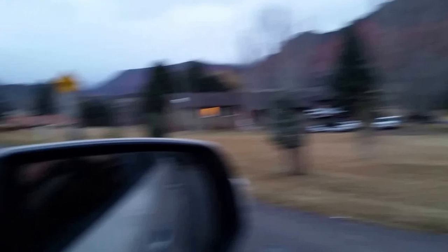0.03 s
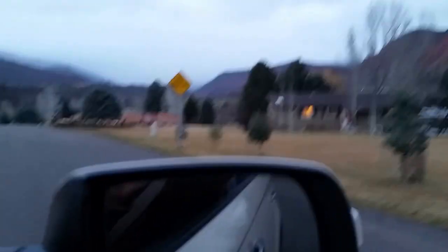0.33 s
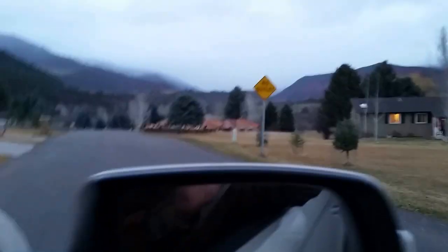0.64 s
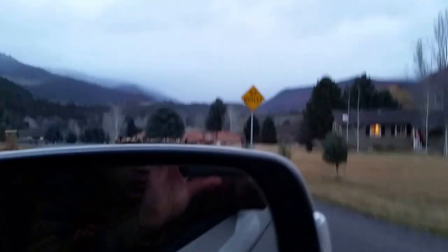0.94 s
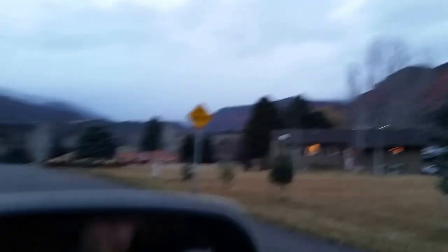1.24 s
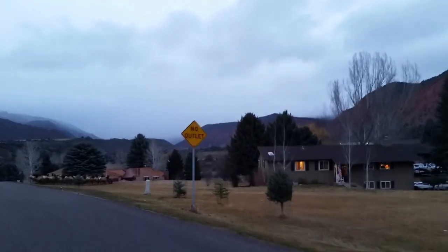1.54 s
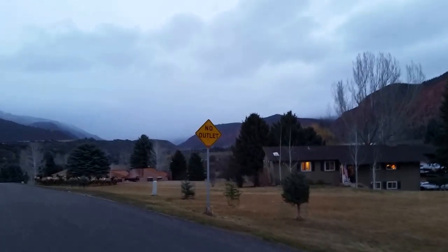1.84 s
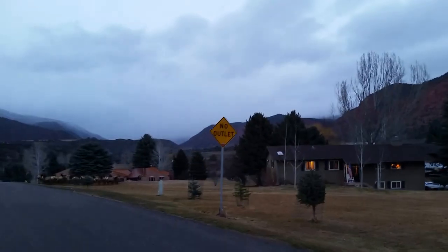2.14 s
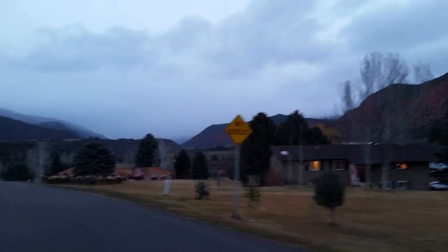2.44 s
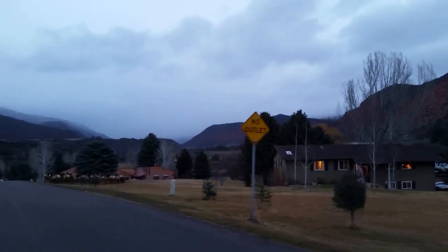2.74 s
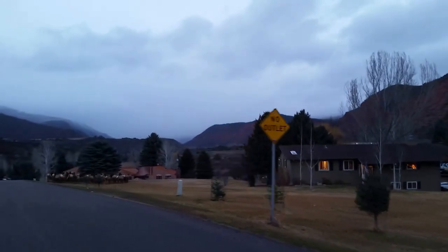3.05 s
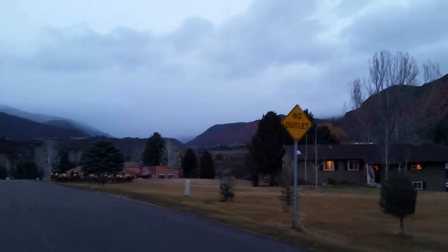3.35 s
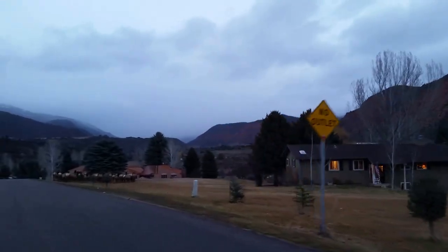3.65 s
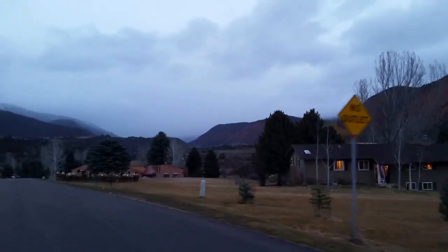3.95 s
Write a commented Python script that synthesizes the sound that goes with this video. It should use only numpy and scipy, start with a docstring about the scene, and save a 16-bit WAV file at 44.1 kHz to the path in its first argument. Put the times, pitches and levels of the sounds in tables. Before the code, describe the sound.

Low, rumbling wind starts after a near-silent moment and keeps hitting the microphone in uneven thumps and rasping flutters, shifting between left and right. It is held at a moving car's window, with faint tyre hiss and a small tick.

```python
"""Wind buffets a microphone held at the window of a car rolling along a quiet road.
Its two openings (ports), left and right, each get their own low rumble and sputtering flutter.
Single swirls of air (eddies) thump them and, when sharp, tear into a rasp. All this wind is built
from tiny kicks of air pressure. Under it lie faint tyre and air hiss, one sharp tick, a few tiny
ones and a brief brush on the housing."""
import sys
import numpy as np
from scipy import signal
from scipy.fft import rfft, irfft
from scipy.io import wavfile
from scipy.ndimage import uniform_filter1d, minimum_filter1d

SR = 44100
rng = np.random.default_rng(int(sys.argv[2]) if len(sys.argv) > 2 else 0)


def store_pcm(level_fs):
    """Save levels as 16-bit WAV."""
    pcm = np.round(np.clip(level_fs, -1, 1) * 32767).astype(np.int16)
    wavfile.write(sys.argv[1], SR, np.atleast_2d(pcm).T)


N = 176400  # 4 seconds
T = np.arange(N) / SR
HZ = np.fft.rfftfreq(N, 1 / SR)

# How the two hisses rise and fall. Each row: time in seconds, level in dB. Table levels are relative.
ROAD_LEVEL = [(0, -116), (.37, -101), (.48, -73), (.67, -64.5), (.8, -68.5), (1.28, -76.5), (1.45, -72.5),
              (2.08, -78.5), (2.3, -75), (2.58, -68.5), (3.45, -65), (4, -65.5)]
AIR_LEVEL = [(0, -118), (.37, -95), (.49, -70), (.66, -54.5), (.78, -57.5), (.9, -63), (1.08, -79.5),
             (1.64, -80.5), (1.76, -71.5), (2.08, -84), (2.55, -69), (2.98, -70.5), (3.72, -66), (4, -72.5)]
# Ticks on the housing. Each row: start in seconds, left level in dB, right level in dB,
# strength of the snap against the knock in dB.
TICKS = [(.389, -72, -53, 2.5), (.449, -72, -54.5, 1.5), (.828, -31, -26.5, 10), (1.404, -35, -55, -28),
         (2.455, -44.5, -52, -7), (3.747, -62, -62, 9)]
# Airflow at each port. Each row: time in seconds, rumble level in dB, flutter level in dB.
LEFT_FLOW = [(0.35, -87, -101), (0.44, -37.5, -76), (0.57, -37, -51.5), (0.62, -11.5, -46.5),
             (0.8, -20, -33.5), (1.08, -14, -33.5), (1.25, -20, -26.5), (1.44, -22, -34.5),
             (1.49, -26.5, -53.5), (1.54, -45.5, -57), (1.59, -27.5, -41), (1.8, -15.5, -33.5),
             (2.03, -36, -42.5), (2.3, -24, -48), (2.44, -21.5, -31), (2.49, -24, -43), (2.56, -19.5, -31),
             (2.76, -24.5, -38), (3.17, -19, -38.5), (3.24, -16.5, -32), (3.56, -16.5, -26),
             (3.72, -20, -45), (3.82, -16, -27), (3.94, -24, -53)]
RIGHT_FLOW = [(0.365, -113, -102), (0.385, -35.5, -72), (0.42, -35.5, -62), (0.46, -24.5, -58),
              (0.56, -18.5, -43), (0.68, -28.5, -57.5), (0.8, -36.5, -49), (1.0, -27.5, -66),
              (1.17, -31, -46.5), (1.28, -37.5, -64), (1.45, -29.5, -50.5), (1.56, -15, -34),
              (1.66, -27, -48), (1.89, -33.5, -48), (2.06, -36.5, -63.5), (2.2, -19.5, -41),
              (2.3, -26.5, -46), (2.52, -25.5, -44), (2.68, -20, -33), (3.0, -16, -33.5),
              (3.25, -32.5, -28.5), (3.31, -29, -41), (3.42, -21, -38), (3.5, -25.5, -38.5),
              (3.7, -17.5, -29.5), (3.93, -28.5, -35.5)]
# Eddies that hit each port. Each row: middle in seconds, length in seconds, thump level in dB, rasp level in dB
# and, on the left only, reach in Hz (a higher reach sounds brighter). The left row at 1.682 s is not an eddy
# but the brush first catching on the housing.
LEFT_EDDIES = [(.622, 0.017, -8, -21, 150), (.688, 0.014, -5.5, -10.5, 190), (.714, 0.012, -8, -10, 200),
               (.75, 0.004, -2.5, -11, 156), (.797, .012, -5, -19.5, 160), (.836, 0.0061, -16, -17.5, 180),
               (.864, 0.0088, -14, -10.5, 170), (.907, 0.015, -25, -16.5, 175),
               (.945, 0.018, -15.5, -13, 370), (.99, 0.019, -10, -14, 317), (1.056, 0.034, -13.5, -24, 157),
               (1.113, 0.016, -12.5, -15.5, 640), (1.167, 0.02, -14.5, -21.5, 381),
               (1.185, 0.0064, -23.5, -17, 170), (1.211, 0.016, -34, -15.5, 330),
               (1.239, 0.0065, -9.5, -16, 850), (1.256, 0.013, 0.5, -10, 930),
               (1.303, 0.02, -6.5, -17.5, 680), (1.331, 0.017, -13.5, -20.5, 400),
               (1.368, 0.031, -15, -19, 300), (1.391, 0.0071, -9, -20, 480),
               (1.409, 0.012, -10, -19.5, 560), (1.448, 0.015, -11, -17.5, 324),
               (1.601, 0.033, -17, -21.5, 150), (1.652, .013, -18.5, -16, 280),
               (1.682, .004, -29, -33.5, 900), (1.738, 0.028, -16.5, -22, 330),
               (1.781, 0.028, -21, -21, 320), (1.835, 0.014, -12, -21.5, 240),
               (1.866, 0.0039, -10.5, -16.5, 310), (1.949, 0.014, -18, -25, 543),
               (1.998, 0.0056, -17.5, -23, 348), (2.053, 0.012, -20, -32, 283),
               (2.097, 0.012, -20, -24, 436), (2.168, 0.011, -23.5, -23, 272),
               (2.214, .012, -25, -30.5, 170), (2.251, 0.012, -16, -29, 160),
               (2.361, .011, -11.5, -19.5, 292), (2.419, 0.0097, -12.5, -14, 260),
               (2.455, 0.0049, -26.5, -29, 810), (2.542, 0.0037, -7, -20, 830),
               (2.571, .015, -8.5, -18.5, 440), (2.61, 0.0096, -9, -24.5, 540),
               (2.666, 0.025, -9, -21, 370), (2.764, 0.0046, -7.5, -21.5, 290),
               (2.816, 0.027, -11, -24.5, 380), (2.917, 0.01, -15, -17, 225), (3.028, 0.011, -3, -16, 490),
               (3.136, .01, -9, -19, 360), (3.225, 0.019, -3.5, -18, 570), (3.26, 0.013, -11, -22.5, 610),
               (3.273, 0.011, -11.5, -15, 230), (3.313, 0.014, -6.5, -11, 325),
               (3.332, 0.0084, -16, -13, 230), (3.378, 0.0092, -18, -13.5, 400),
               (3.402, 0.0078, -4.5, -18, 420), (3.43, 0.0044, -12, -18.5, 290),
               (3.455, 0.0017, -22, -11, 600), (3.473, 0.017, -10, -20.5, 560),
               (3.517, 0.0026, -12, 1, 560), (3.531, 0.016, -20.5, -13, 800),
               (3.564, 0.017, -10.5, -19, 280), (3.601, .022, -24.5, -22, 240),
               (3.695, 0.012, -7.5, -19.5, 230), (3.801, .005, -3, -9.5, 467),
               (3.824, 0.015, -12.5, -15.5, 337), (3.864, 0.0095, -10.5, -14.5, 400),
               (3.886, 0.0047, -15, -17, 230), (3.983, 0.018, -10, -18, 320)]
RIGHT_EDDIES = [(.555, 0.024, -13, -43.5), (1.171, 0.0093, -13.5, -39), (1.582, 0.029, -9, -32.5),
                (1.658, 0.016, -18, -39), (1.733, 0.014, -12.5, -28), (1.826, 0.021, -11.5, -32),
                (1.955, 0.023, -12.5, -43), (2.379, 0.016, -9, -50), (2.57, 0.02, -13, -42),
                (2.636, 0.016, -12, -41.5), (2.683, .01, 1.5, -20), (2.753, 0.004, -1, -30),
                (2.791, 0.041, -8.5, -34.5), (2.856, 0.014, -6, -18.5), (2.906, 0.0058, 0, -23),
                (2.966, 0.013, -2.5, -35), (3.008, 0.04, -5, -19.5), (3.175, 0.0086, -8.5, -19),
                (3.212, 0.046, -5.5, -24.5), (3.273, 0.0082, 0, -21.5), (3.383, 0.015, -10.5, -33.5),
                (3.693, 0.018, -6, -22), (3.76, 0.0097, -5, -20), (3.927, .013, 4, -13.5),
                (3.98, 0.015, -5.5, -29)]
# Tone colours, or how much bass and treble a sound has. Each row: frequency in Hz, level in dB.
ROAD_COLOUR = [(150, 1.5), (550, 8), (1000, 5.5), (1600, 3), (2200, -3), (2750, -4.5), (3350, -5),
               (4400, -12.5), (5200, -22), (9000, -43.5)]
LEFT_AIR_COLOUR = [(5000, -30), (8000, -7), (8800, 4), (11000, -9), (12200, 0), (15700, -5), (16300, -37)]
RIGHT_AIR_COLOUR = [(5000, -28), (11000, -8), (13500, 0), (15700, -2.5), (16300, -42.5)]
BRUSH_COLOUR = [(4500, 2.5), (6500, -22.5), (8500, 0), (10300, -9), (11800, 4), (13500, -9.5), (15200, 5),
                (16200, -24)]
TICK_COLOUR = [(300, 6), (1000, 11), (2400, -0.5), (3700, 0.5), (5000, -10.5), (6500, -22.5), (10300, -7),
               (12000, -13), (14000, -11.5), (16000, -16)]
RUMBLE_COLOUR = [(8, -30.5), (25, -8.5), (50, -1.5), (100, 3), (170, 0), (270, -11.5), (380, -23),
                 (600, -61), (1200, -93)]
PORT_COLOUR = [(1200, -1.5), (2100, 1.5), (2800, -4), (4000, -12.5), (6000, -37), (12000, -71)]

LEFT, RIGHT = 0, 1  # each pair of settings below is (left, right)
ROAD_DB, AIR_DB = (15, 13.5), (-1, -3.5)
RUMBLE_DB, FLUTTER_DB, THUMP_DB, RASP_DB = (-1, 0), (4, 2.5), (-1.5, -2.7), (-3.5, -3.5)
CALM_REACH_HZ, STRONG_REACH_HZ = (152, 112), (313, 170)
SHELTERED_REACH_HZ = 218  # the right port is sheltered, so its eddies are all dull
KICKS_PER_S, SHARP_KICKS_PER_S = 900, 340


def amp(db):
    """Turns decibels into a number to multiply by (a gain)."""
    return 10 ** (np.asarray(db) / 20)


def unit(x):
    """Scales a sound to an average strength (rms) of 1."""
    return x / np.sqrt(np.mean(x ** 2) + 1e-30)


def curve(rows, column=1):
    """Joins the points of a time table with straight lines."""
    rows = np.array(rows)
    return np.interp(T, rows[:, 0], rows[:, column])


def colour(points, hz):
    """Reads a tone colour table as a gain at each frequency."""
    points_hz, db = np.transpose(points)
    return amp(np.interp(np.log(hz + 1), np.log(points_hz), db))


def shaped(x, gain):
    """Turns each frequency of a sound up or down by its gain."""
    return irfft(rfft(x) * gain, len(x))


def noise(gain):
    """Noise with the given tone colour and a strength of 1."""
    return unit(shaped(rng.standard_normal(N), gain))


def steadied(x, size):
    """Evens out chance swells by following the power over `size` samples."""
    power = uniform_filter1d(uniform_filter1d(x ** 2, size), size)
    return x / np.sqrt(abs(power) + 1e-12)


def add(mix, start_s, sound):
    """Mixes a sound in at the given time."""
    part = mix[max(round(start_s * SR), 0):][:len(sound)]
    part += sound[:len(part)]


def hiss(port, flicker_db=1.5):
    """Tyres on asphalt and thin air hiss, both flickering slightly."""
    flicker = amp(flicker_db * noise(HZ * np.exp(-HZ / 20)))
    road = noise(colour(ROAD_COLOUR, HZ)) * amp(curve(ROAD_LEVEL) + ROAD_DB[port])
    air_colour = (LEFT_AIR_COLOUR, RIGHT_AIR_COLOUR)[port]
    air = noise(colour(air_colour, HZ)) * amp(curve(AIR_LEVEL) + AIR_DB[port])
    return flicker * (road + air)


def brush(start_s=1.677, peak_s=1.738, end_s=1.75, swell_s=.018, fade_s=.004):
    """Something slides lightly over the housing: it catches, swells briefly and lifts off."""
    contact = (T > start_s) * np.exp(-np.maximum(T - end_s, 0) / fade_s)
    swell = np.exp(-((T - peak_s) / swell_s) ** 2)
    return noise(colour(BRUSH_COLOUR, HZ)) * contact * (amp(-63.5) + amp(-60) * swell)


def ticks(port, snap_s=.00061, knock_s=.0017, split_hz=4500, size=1024):
    """Each tick on the housing is a high, very short snap over a lower knock that rings longer."""
    out = np.zeros(N)
    t, hz = (np.arange(size) - size / 2) / SR, np.fft.rfftfreq(size, 1 / SR)
    lows = 1 / (1 + (hz / split_hz) ** 6)
    for start_s, *levels_db, snap_db in TICKS:
        snap = unit(rng.standard_normal(size) * (t >= 0) * np.exp(-abs(t) / snap_s))
        knock = unit(rng.standard_normal(size) * (t >= 0) * np.exp(-abs(t) / knock_s))
        hit = amp(snap_db) * shaped(snap, 1 - lows) + shaped(knock, lows)
        tick = unit(shaped(hit, colour(TICK_COLOUR, hz)))
        add(out, start_s - size / 2 / SR, .5 * amp(levels_db[port]) * tick)
    return out


def rasp_colour(hz, reach_hz, bass_cut_hz=255):
    """Swirling air is weaker at high frequencies; smaller whirls reach higher."""
    return np.exp(-hz / reach_hz) / (1 + (bass_cut_hz / (hz + 1)) ** 4) * colour(PORT_COLOUR, hz)


def pressure_kicks(size, per_s):
    """The air pushes and pulls at random, with uneven strength and timing."""
    sign = rng.choice([-1., 1.], size)
    strength = amp(5.5 * rng.uniform(-1.57, 1.8, size))
    at = ((np.arange(size) + rng.random(size)) * SR / per_s).astype(int)
    return np.bincount(at[at < size], (sign * strength)[at < size], size)


def snaps(size, per_side=8, gap_s=.0085, jitter=.3, uneven_db=14):
    """One sharp pressure kick at the heart of an eddy and a loose row of weaker ones on each side."""
    slots = np.arange(-per_side, per_side + 1)
    off_centre = slots != 0
    nudge = jitter * rng.uniform(-1, 1, len(slots)) * off_centre
    at = size / 2 + (slots + nudge) * gap_s * SR
    sign = rng.choice([-1., 1.], len(slots))
    strength = amp(-uneven_db * rng.random(len(slots)) * off_centre)
    return np.bincount(np.clip(at, 0, size - 1).astype(int), sign * strength, size)


def airflow(rows, port, sputter_hz=43.7, strong_db=-38, blend_db=.5):
    """Wind over a port makes a rumble and a sputtering flutter that brightens as it gets strong."""
    kicks = pressure_kicks(N, KICKS_PER_S)
    rumble = steadied(unit(shaped(kicks, colour(RUMBLE_COLOUR, HZ))), size=1100)
    calm = steadied(unit(shaped(kicks, rasp_colour(HZ, CALM_REACH_HZ[port]))), size=1200)
    sharp_kicks = pressure_kicks(N, SHARP_KICKS_PER_S)
    strong = unit(shaped(sharp_kicks, rasp_colour(HZ, STRONG_REACH_HZ[port])))
    flutter_db = curve(rows, column=2)
    sputter_db = 4.5 * np.clip(noise(HZ * np.exp(-(HZ / sputter_hz) ** 2)), -2, 2)
    # The brighter flutter blends in as the level passes strong_db.
    share = 1 / (1.5 + np.exp((strong_db - flutter_db - sputter_db) / blend_db))
    flutter = unit(amp(sputter_db)) * (calm * np.sqrt(1 - share ** 2) + share * strong)
    return rumble * amp(curve(rows) + RUMBLE_DB[port]) + flutter * amp(flutter_db + FLUTTER_DB[port])


def eddies(rows, port, size=12000):
    """Each eddy is a swelling knot of pressure kicks: a low thump, a dull rasp and a few sharp snaps."""
    out = np.zeros(N)
    t, hz = (np.arange(size) - size / 2) / SR, np.fft.rfftfreq(size, 1 / SR)
    soft_edges = signal.windows.tukey(size, .5)
    for middle_s, length_s, thump_db, rasp_db, reach_hz in rows:
        kicks = pressure_kicks(size, KICKS_PER_S)
        away = (2 * t / length_s) ** 2  # 0 in the middle, 1 half a length away
        # Each layer: its kicks, how many times they have halved in strength, level, tone colour.
        thump = (kicks, away / 1.055 ** 2, thump_db + THUMP_DB[port], colour(RUMBLE_COLOUR, hz))
        rasp = (kicks, away, rasp_db + RASP_DB[port], rasp_colour(hz, reach_hz * .74))
        sharp = (snaps(size), (away / 1.62) ** 2, rasp_db + RASP_DB[port], rasp_colour(hz, reach_hz))
        for drive, halvings, db, tone in (thump, rasp, sharp):
            swell = .5 ** halvings
            burst = unit(soft_edges * shaped(drive * swell, tone))
            strength = amp(db) * np.sqrt(np.mean(swell ** 2))  # longer eddies carry more energy
            add(out, middle_s - size / 2 / SR, strength * burst)
    return out


def scene():
    """Each port feels its own swirls of air, so the left and right sides differ."""
    left = airflow(LEFT_FLOW, LEFT) + eddies(LEFT_EDDIES, LEFT) + hiss(LEFT) + ticks(LEFT) + brush()
    dull_eddies = [(*row, SHELTERED_REACH_HZ) for row in RIGHT_EDDIES]
    right = airflow(RIGHT_FLOW, RIGHT) + eddies(dull_eddies, RIGHT) + hiss(RIGHT) + ticks(RIGHT)
    return np.array([left, right])


def record(dry, ceiling=.97, top_hz=16200):
    """A fast limiter turns down the loudest peaks; then a filter cuts the highest treble."""
    gain = minimum_filter1d(1 / np.maximum(abs(dry) / ceiling, 1), size=400, axis=1)
    smooth_gain = uniform_filter1d(uniform_filter1d(gain, size=200, axis=1), size=200, axis=1)
    treble_cut = signal.firwin(511, top_hz, window=("kaiser", 9), fs=SR)
    return signal.oaconvolve(dry * smooth_gain, treble_cut[None], "same")


dry = scene()
out = record(dry)
store_pcm(out)
```